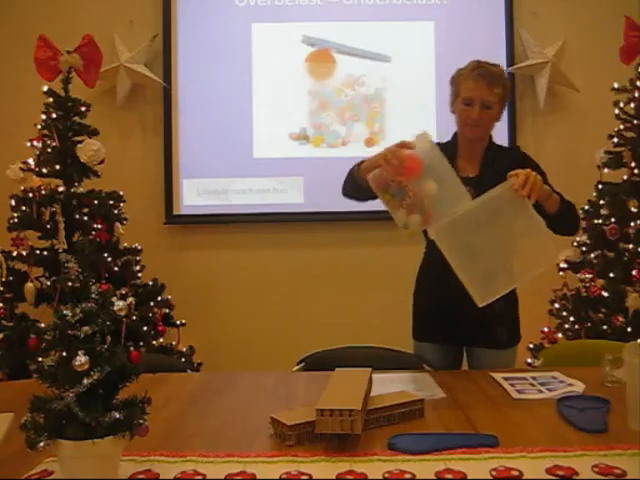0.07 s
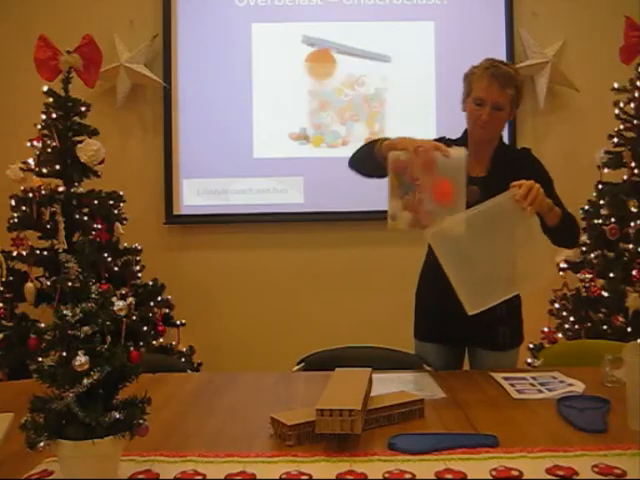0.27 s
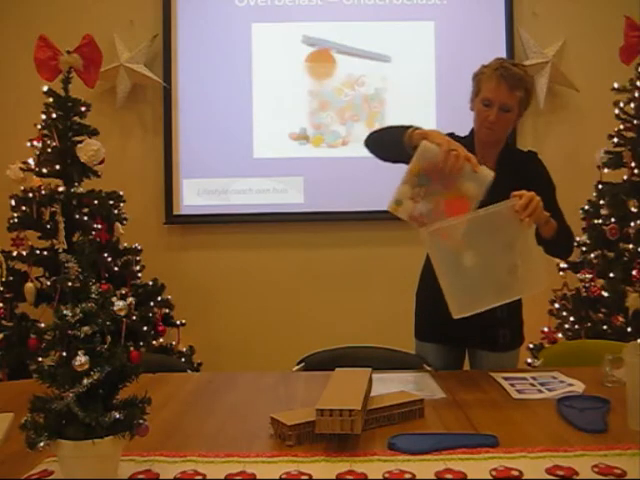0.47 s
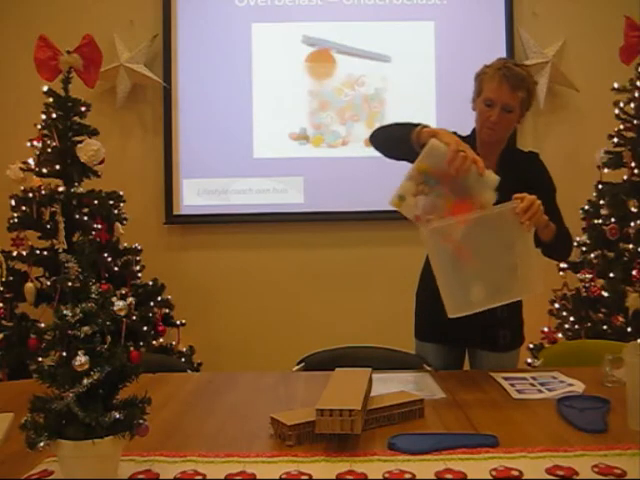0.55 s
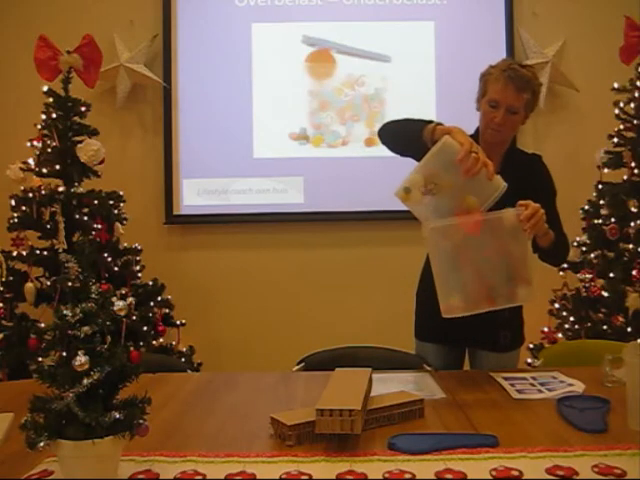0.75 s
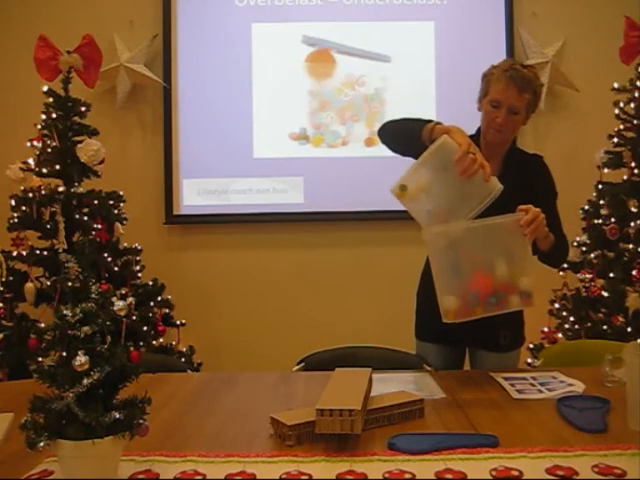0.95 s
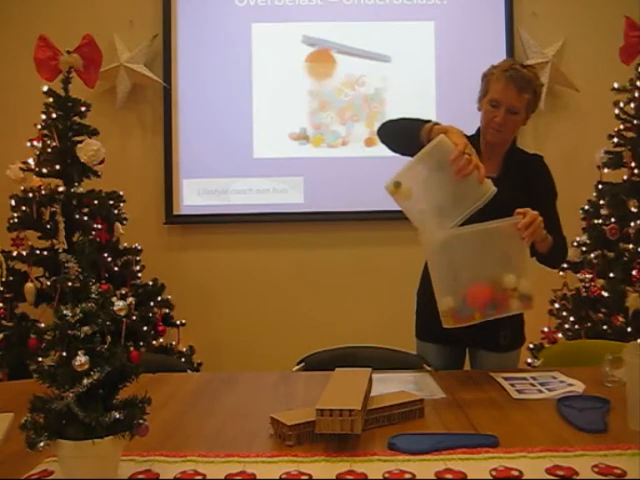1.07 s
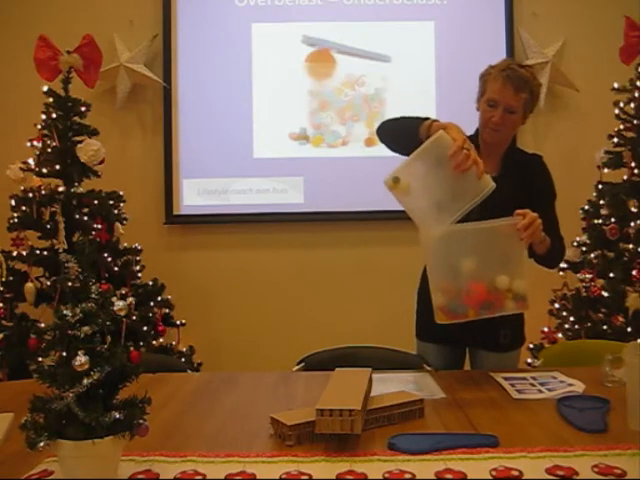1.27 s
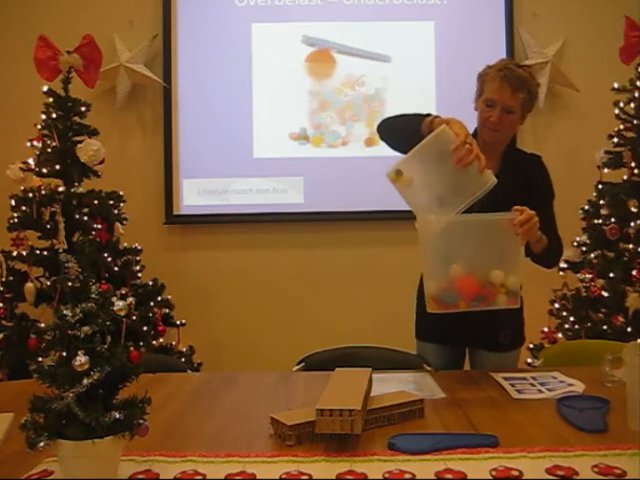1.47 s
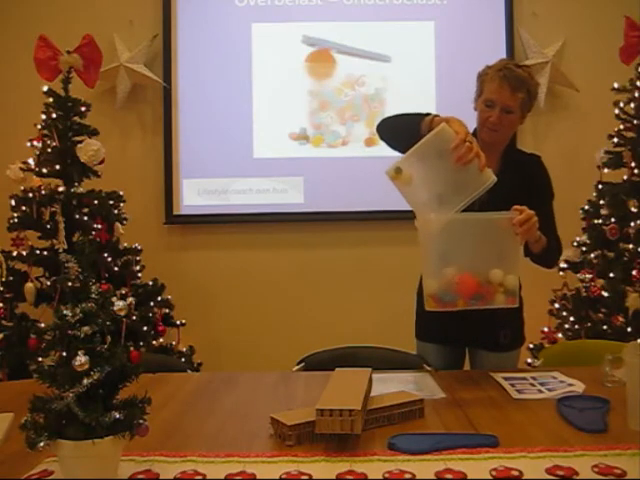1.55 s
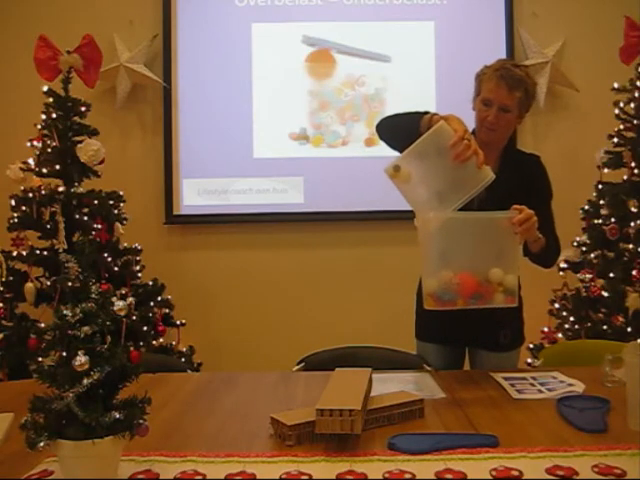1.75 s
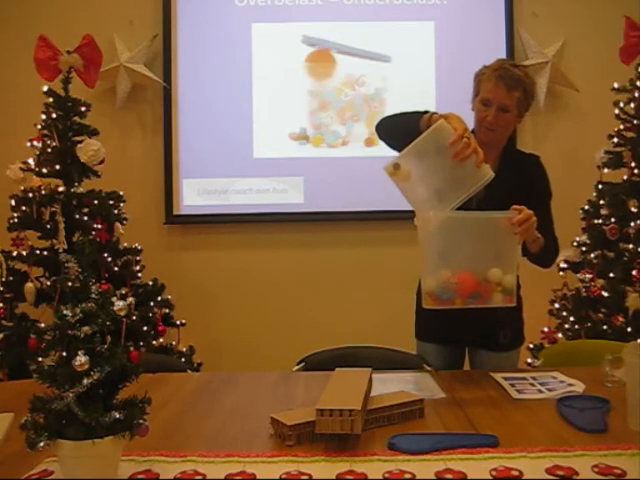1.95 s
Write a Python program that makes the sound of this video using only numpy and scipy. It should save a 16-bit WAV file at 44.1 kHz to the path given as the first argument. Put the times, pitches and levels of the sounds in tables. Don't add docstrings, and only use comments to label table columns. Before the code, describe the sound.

Many small hard balls tumble into a hollow plastic tub, starting with a few faint clacks, bursting into a loud dense clatter, then thinning to single clicks in an echoing room, heard through a thin-sounding camera microphone.

```python
import sys
import numpy as np
from scipy import signal
from scipy.fft import rfft, irfft, next_fast_len
from scipy.io import wavfile
from scipy.ndimage import uniform_filter1d, map_coordinates

SR = 44100
rng = np.random.default_rng(int(sys.argv[2]) if len(sys.argv) > 2 else 0)


def unload_audio(sound):
    columns = np.transpose(np.atleast_2d(sound))
    steps = np.round(np.clip(columns, -1, 1) * 32767)
    wavfile.write(sys.argv[1], SR, steps.astype(np.int16))


def field_ratio(decibels):
    return 10 ** (np.asarray(decibels, dtype=float) / 20)


N = 88200


def unit(x):
    return x / np.sqrt(np.mean(x ** 2) + 1e-20)


def along(points, hz):
    f, v = np.transpose(points)
    return np.interp(np.log(hz + 1), np.log(f + 1), v)


def wobble(rate):
    knots = rng.standard_normal(int(N * rate / SR) + 4)
    return map_coordinates(knots, [np.arange(N) * rate / SR])


def coloured(x, gain_db):
    m = 2 * next_fast_len(N // 2 + 4096)
    gain = field_ratio(gain_db(np.fft.rfftfreq(m, 1 / SR)))
    c = irfft(np.log(gain + 1e-6), m)
    c[1:m // 2] *= 2
    c[m // 2 + 1:] = 0
    return irfft(rfft(x, m) * np.exp(rfft(c)), m)[:N]


def rings(s, hz, t60, gain, size):
    t = np.arange(size) / SR
    decay = field_ratio(-60 * t / t60[:, None])
    wave = gain[:, None] * np.sin(2 * np.pi * hz[:, None] * t) * decay
    at = np.round(s * SR).astype(int)[:, None] + np.arange(size)
    return np.bincount(at.ravel(), wave.ravel(), N + size + SR)[:N]


def clatter():
    # start in seconds, clatter level in dB, brightness of the treble in dB.
    pour_course = [(0, -37, -3.5), (.14, -40, 1), (.205, -33.5, -12), (0.239, -22.5, -11),
                   (0.251, -20.5, -2.5), (.32, -18, -5.5), (.5, -16, -1), (.58, -19, 4.5), (.65, -19, -2),
                   (.72, -22.5, 5), (.9, -17, 1), (1.15, -17.5, 0), (1.36, -17, -10), (1.47, -23, -12),
                   (1.58, -25, -14), (1.631, -28, -17), (1.741, -28.5, -21), (2, -53.5, 11.5)]
    s, level_db, tilt_db = np.transpose(pour_course)
    t = np.arange(N) / SR
    hits_per_s, size_db, biggest = 1800, 3.3, 3
    cycles, rattle_db = 3.6, -7
    clump_db, treble_clump_db = 1.1, 1.3

    d = rng.random((int(hits_per_s * N / SR), 9))
    at = d[:, 0] * (N - 1) / SR
    strength_db = size_db * np.minimum(-np.log(d[:, 1] + 1e-9), biggest)
    strength = field_ratio(strength_db) * np.sign(d[:, 2] - .5)
    body = np.zeros(N)
    # lowest and highest ring in Hz, column of random draws.
    for lo, hi, k in [(250, 2000, 3), (1500, 6000, 4), (5000, 16000, 5)]:
        hz = lo * (hi / lo) ** d[:, k]
        delayed = at + .002 * d[:, k + 3]
        body += rings(delayed, hz, cycles / hz + 0.0027, strength * hz / 1000, size=500)
    body = unit(body) + field_ratio(rattle_db) * rng.standard_normal(N)

    clumps_db = clump_db * wobble(59.98)
    flat = unit(coloured(body * field_ratio(clumps_db), hollow_db))
    power = uniform_filter1d(uniform_filter1d(flat ** 2, size=3000), size=3000)
    flat = flat / np.sqrt(power)
    highpass = signal.butter(2, 3500, "high", fs=SR, output="sos")
    treble = signal.sosfiltfilt(highpass, flat)
    bright = field_ratio(np.interp(t, s, tilt_db) + treble_clump_db * wobble(38.1))
    return (flat - treble + bright * treble) * field_ratio(np.interp(t, s, level_db))


def hollow_db(hz):
    # frequency in Hz, level in dB.
    tub_colour = [(60, -24), (200, -12), (420, -0.5), (700, -4.5), (1000, -3), (2500, -5), (6000, -18.5),
                  (14500, -40)]
    # centre in Hz, width in Hz, height in dB.
    hollow_rings = [(354, 13, 4.5), (424, 17, -1.5), (447, 8.7, 9.5), (531.5, 5.7, 10), (899, 130, 6),
                    (1120, 46, 5), (1600, 117, 3.5)]
    peaks = sum(db / (1 + (2 * (hz - c) / w) ** 2) for c, w, db in hollow_rings)
    return along(tub_colour, hz) + peaks


def clacks():
    # start in seconds, peak in dB, main ring in Hz, brightness in dB.
    ball_clacks = [(0.0994, -21, 1060, 1), (0.158, -13, 1060, -5), (0.1858, -29, 955, -20),
                   (0.208, -16.5, 3650, 6), (0.2474, 1, 1144, 4), (0.2568, -7, 2070, 1),
                   (0.2694, 1.5, 1420, 0), (0.394, -1.5, 2700, 5.5), (0.4082, -4.5, 1290, 6.5),
                   (0.4465, -4.5, 1570, -1), (0.4953, 4.5, 1280, -0.5), (0.511, -3, 1640, 8),
                   (0.5611, 1.5, 1550, 4.5), (0.6173, -7, 1150, 11), (0.7041, -3, 2580, 5.5),
                   (0.718, 0.5, 1720, 1), (0.7668, 0.5, 1700, 6), (0.7772, -4, 1180, 7),
                   (0.7918, 3, 1190, -14), (0.821, -4, 1570, 8), (0.8432, -6.5, 1070, -3),
                   (0.8995, -2, 2630, 5), (0.9977, -1.5, 1470, 6), (1.0687, -10, 1430, 7.5),
                   (1.1094, 0, 3370, 3), (1.13, -14, 2580, 21), (1.2142, -20.5, 1210, 21.5),
                   (1.2736, -12.5, 1800, 14.5), (1.389, -7, 4000, 12),
                   (1.41, -7, 1120, 7), (1.424, -17, 6040, 13), (1.51, -18.5, 5600, 10.5),
                  (1.5535, -10, 2370, 6.5), (1.581, -8, 2850, -9), (1.645, -7.5, 1490, -2.5),
                  (1.663, -9.5, 1470, -7), (1.678, -16.5, 5650, -7), (1.697, -15.5, 5450, 7),
                  (1.709, -13.5, 1470, 1), (1.729, -16, 990, -2),
                   (0.142, -18, 1010, -9), (0.189, -15, 1040, -7), (0.29, -25, 1480, 0),
                     (0.317, -0.5, 1420, -19), (0.349, -1.5, 1120, 3), (0.3651, -4.5, 1070, 4.5),
                     (0.4763, -4, 1300, 7.5), (0.525, -12, 1170, 7), (0.598, -21, 1650, -4),
                     (0.626, -12.5, 1160, 7), (0.6704, -5.5, 1490, 6), (0.6963, -4.5, 1570, 4),
                     (0.7112, -0.5, 1640, 0.5), (0.7565, -14, 1690, -3), (0.8033, -2.5, 1180, -17),
                     (0.8701, -4, 1680, -5), (0.9315, -0.5, 1600, -11), (0.96, 1, 980, -12),
                     (1.0237, -2, 930, 5), (1.0451, -13, 1170, 1), (1.1447, -16, 940, 6),
                     (1.1806, -4, 950, -15), (1.2391, -10, 1090, 11), (1.3185, -7, 870, 2),
                     (1.3554, -2, 1120, -7), (1.4388, -13, 1480, 13), (1.49, -7.5, 950, -4),
                     (1.5294, -16.5, 900, 6)]
    s, db, hz, bright_db = np.transpose(np.array(ball_clacks))
    level_db, ring_t60, side_db, spread_s = -5.5, 0.018, -4, .008
    crack_db, crack_t60, tick_db, tick_t60 = -10, 0.048, 13.5, 0.0016

    out = rings(s + 0.001003, hz, ring_t60 * np.minimum(1, 2000 / hz), field_ratio(db), size=1500)

    d = rng.random((len(s), 3, 12))
    side_hz = 600 * 10 ** d[:, 0]
    tilt_db = bright_db[:, None] * np.log10(side_hz / 600)
    gain = field_ratio(db[:, None] + side_db + 9.44 * (d[:, 1] - 1.5) + tilt_db).ravel()
    side_s = (s[:, None] + spread_s * d[:, 2] ** 2).ravel()
    side_hz = side_hz.ravel()
    out += rings(side_s, side_hz, ring_t60 * np.sqrt(1500 / side_hz), gain, size=1500)

    t = np.arange(1800) / SR
    crack = np.zeros(N + SR)
    lumps = field_ratio(0.83 * unit(uniform_filter1d(rng.standard_normal((len(s), len(t))), size=60)))
    noises = lumps * rng.standard_normal(lumps.shape)
    decay = field_ratio(-60 * t / crack_t60) + field_ratio(tick_db - 60 * t / tick_t60)
    shape = decay * (1 - np.exp(-t / 0.0012))
    for start, peak_db, noise in zip(s, db + bright_db, noises):
        crack[round(start * SR):][:len(t)] += field_ratio(peak_db + crack_db) * shape * noise
    crack_colour = [(500, -0.5), (3000, 8.5), (7000, -6.0), (14000, -11.5)]  # Hz, dB
    return field_ratio(level_db) * (out + coloured(crack, lambda f: along(crack_colour, f)))


def snaps():
    # start in seconds, peak in dB, ring in Hz.
    ball_snaps = [(0.101, -22, 2710), (0.1435, -21, 1540), (0.1584, -18, 1300), (0.1878, -34, 1210),
                  (0.1925, -18, 1640), (0.209, -14, 1680), (0.2174, -13.5, 1350), (0.23, -19, 1340),
                  (0.2432, -11, 1490), (0.2453, -6, 1580), (0.2512, -6, 2320), (0.2704, -5.5, 2090),
                  (0.321, -32, 1420), (0.3542, -7, 1570), (0.4065, 0, 1940), (0.446, -6, 1430),
                  (0.4533, -3, 2410), (0.514, -1, 2830), (0.5201, -4, 2000), (0.5348, -3, 2120),
                  (0.563, -14, 1610), (0.567, -13, 3630), (0.6011, -2.5, 1580), (0.6197, -6, 1380),
                  (0.6274, -7.5, 2740), (0.6432, -21, 3060), (0.6723, -13, 1640), (0.7039, 0, 2820),
                  (0.7234, 4.5, 2490), (0.757, -10, 2260), (0.768, -7, 2710), (0.7756, 1, 2700),
                  (0.7922, -2, 2630), (0.806, -17, 1620), (0.8241, -1, 1640), (0.899, -3, 2886),
                  (0.905, -13, 2690), (0.9317, -18, 1680), (0.999, -11, 1660), (1.1095, -16, 3170),
                  (1.1843, -16, 1970), (1.2404, -9, 2750), (1.2751, 2.5, 4070), (1.3363, -13, 1510),
                  (1.392, -0.5, 4100), (1.4196, -17, 3620), (1.4395, -13, 1430), (1.5053, -17, 1590),
                  (1.5144, -15, 2260), (1.555, -1, 2560), (1.5866, -25, 2760), (1.647, -18, 1660),
                  (1.6644, -14, 1450), (1.7268, -16, 1590), (1.734, -17, 1170), (1.7655, -29, 2370),
                  (1.7705, -29, 1550), (1.802, -36, 1810), (1.885, -44, 1370), (1.9347, -34, 1550)]
    s, db, hz = np.transpose(ball_snaps)
    level_db, edge_db, lead_s, dull_db, cycles = -1.5, -6.5, .0005, -4, 13
    s = s - lead_s
    db = db + level_db

    d = rng.random((len(s), 3))
    edge_hz = hz[:, None] * np.array([1.6, 2.5, 3.8]) * (0.81 + 0.35 * d)
    edge_hz = np.minimum(edge_hz, 14000).ravel()
    edge_gain = field_ratio((db[:, None] + edge_db * np.arange(1, 4)).ravel())
    out = rings(s, hz, cycles / hz, -field_ratio(db), size=600)
    out += rings(s.repeat(3), edge_hz, cycles / edge_hz + 0.0017, -edge_gain, size=600)
    return coloured(out, lambda f: along([(4000, 0), (14000, dull_db)], f))


def thuds():
    # start in seconds, peak in dB, wall ring in Hz.
    wall_thuds = [(0.145, -23, 483), (0.188, -16.5, 490), (0.222, -8.5, 171), (0.248, -18, 487),
                  (0.316, -12, 503), (0.368, -20, 470), (0.422, -6, 754), (0.6263, 1.5, 440),
                  (0.65, -3.5, 336), (0.67, 2, 428), (0.68, -3.5, 414), (0.695, -2, 410), (0.817, -8, 580),
                  (0.898, -3, 497), (0.949, -11.5, 352), (0.973, -19, 484), (1.001, -14, 710),
                  (1.144, -10, 538), (1.158, -13, 437), (1.274, -8, 435), (1.316, -7.5, 447),
                  (1.405, -9.5, 470), (1.438, -2.5, 470), (1.465, -8.5, 335), (1.525, -15, 462),
                  (1.552, -10.5, 485), (1.612, -18, 390), (1.644, -7, 443), (1.67, -10, 464),
                  (1.708, -12, 646), (1.789, -28, 400)]
    s, db, hz = np.transpose(wall_thuds)
    level_db, over_db, lag_s = -4.5, -12.5, 0.00092
    s = s + lag_s
    db = db + level_db
    t60 = 0.029 * 450 / hz
    main = rings(s, hz, t60, -field_ratio(db), size=3000)
    return main + rings(s, 1.01 * hz, t60 / 2, -field_ratio(db + over_db), size=3000)


def room(x):
    # frequency in Hz, time to fall by 60 dB in seconds.
    room_decay = [(200, 0.82), (1500, 0.52), (5000, 0.28), (12000, 0.54)]
    predelay_s = .006
    wet, step = np.zeros(N + SR), SR // 4
    for a in range(0, N, step):
        hz, t, z = signal.stft(rng.standard_normal(SR // 2), SR, nperseg=256)
        decay = field_ratio(-60 * t / along(room_decay, hz)[:, None])
        tail = signal.istft(z * decay, SR, nperseg=256)[1]
        part = signal.fftconvolve(x[a:a + step], tail / np.linalg.norm(tail))
        wet[a + round(predelay_s * SR):][:len(part)] += part
    return wet[:N]


def jolts():
    # start in seconds, peak in dB, push in Hz.
    low_pushes = [
        (.705, -36, 45),
        (1.275, -22, 110),
    ]
    s, db, hz = np.transpose(low_pushes)
    return rings(s, hz, 0.89 / hz, field_ratio(db), size=3000)


def floor():
    # frequency in Hz, hiss level in dB.
    hiss_colour = [(25, -13), (100, -11), (300, -1.5), (1000, -5.5), (3000, -44), (6000, -25),
                   (12000, -25.5), (14600, -28)]
    # whine in Hz, average level in dB.
    camera_whines = [(7558, -64), (15149, -64)]
    t = np.arange(N) / SR
    out = field_ratio(-43.5) * unit(coloured(rng.standard_normal(N), lambda hz: along(hiss_colour, hz)))
    for hz, db in camera_whines:
        out = out + np.sqrt(2) * field_ratio(db) * np.sin(2 * np.pi * hz * t + 0.27 * wobble(30.0))
    return out


def scene():
    # frequency in Hz, microphone gain in dB.
    mic_colour = [(20, -52), (100, -24), (200, -10.5), (300, -2), (13000, -1.5), (15500, -11.5)]
    room_db = -6
    balls = clatter() + clacks() + snaps() + thuds()
    heard = balls + field_ratio(room_db) * room(balls)
    return (coloured(heard, lambda hz: along(mic_colour, hz)) + jolts() + floor())[None]


def top_cut(x):
    return signal.sosfilt(signal.butter(12, 15830, fs=SR, output="sos"), x)


def record(dry):
    # frequency in Hz, gain at the top edge in dB.
    top_edge = [(15300, 0), (15800, -12), (16000, -70)]
    clipped = dry[0] / (1 + np.abs(dry[0] / .87) ** 8) ** (1 / 8)
    return top_cut(coloured(clipped, lambda hz: along(top_edge, hz))[None])


dry = scene()
out = record(dry)
unload_audio(out)
```